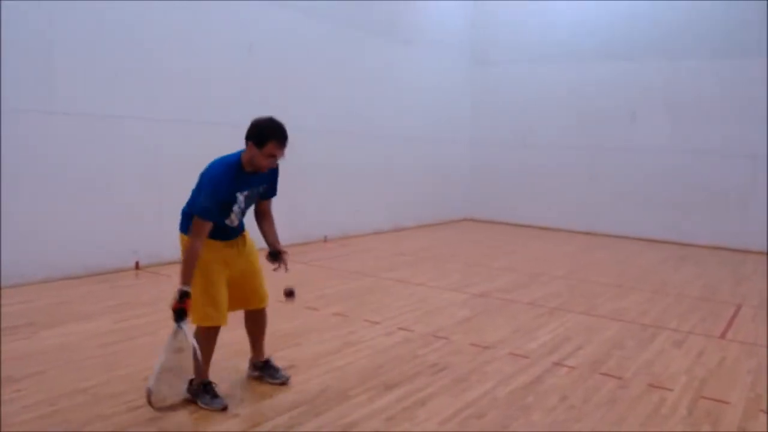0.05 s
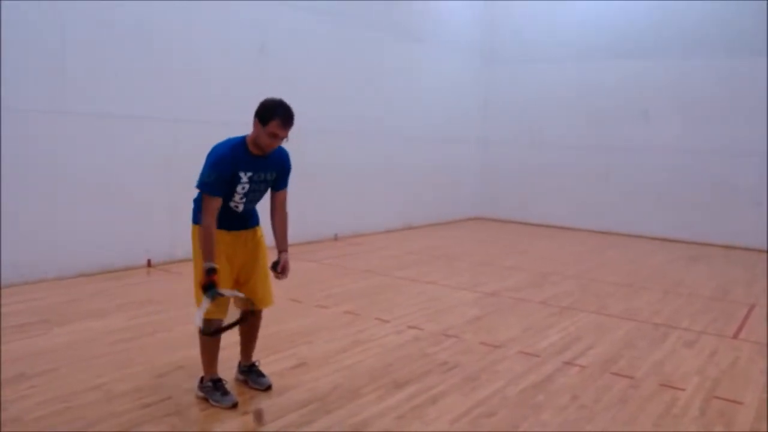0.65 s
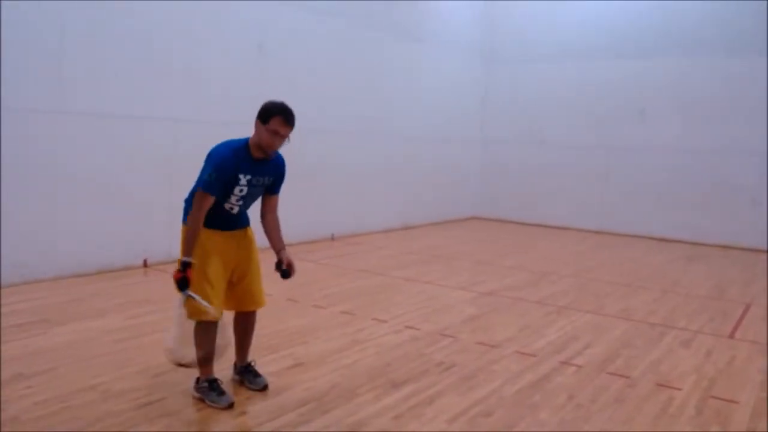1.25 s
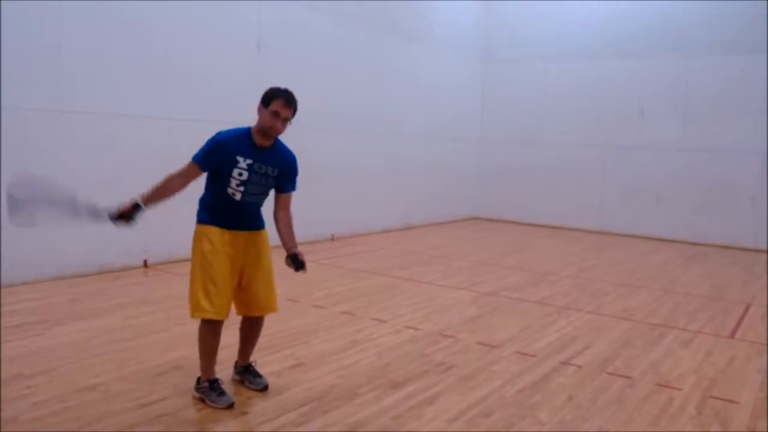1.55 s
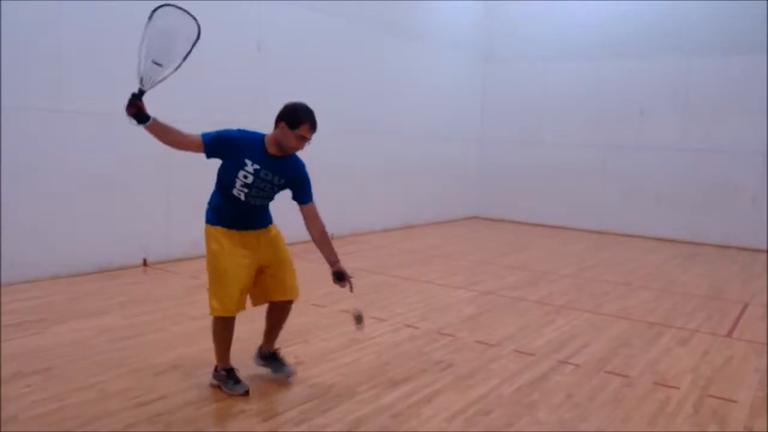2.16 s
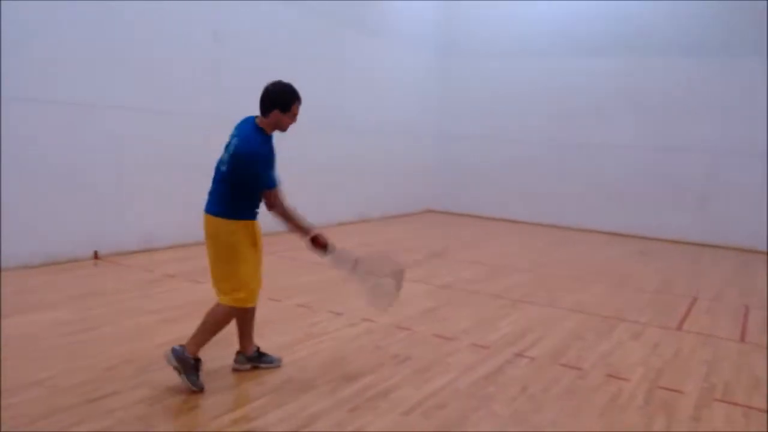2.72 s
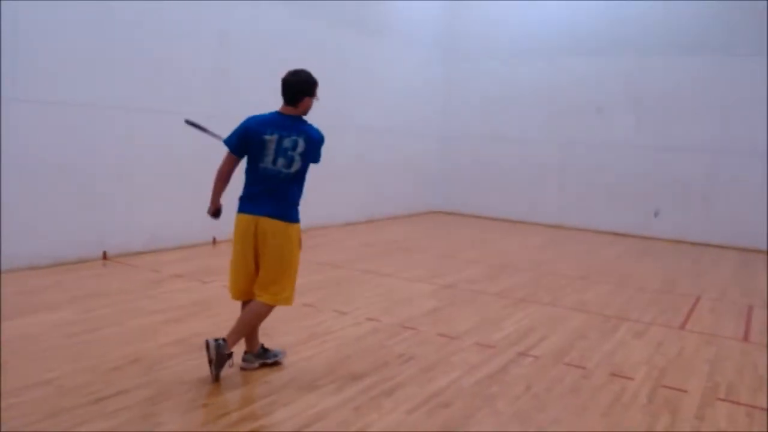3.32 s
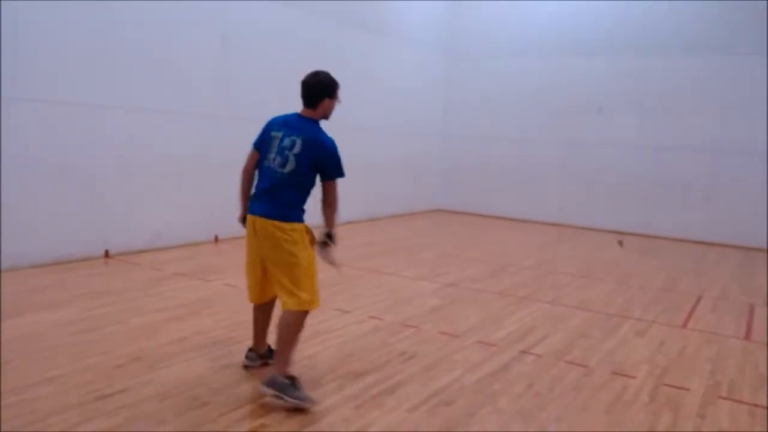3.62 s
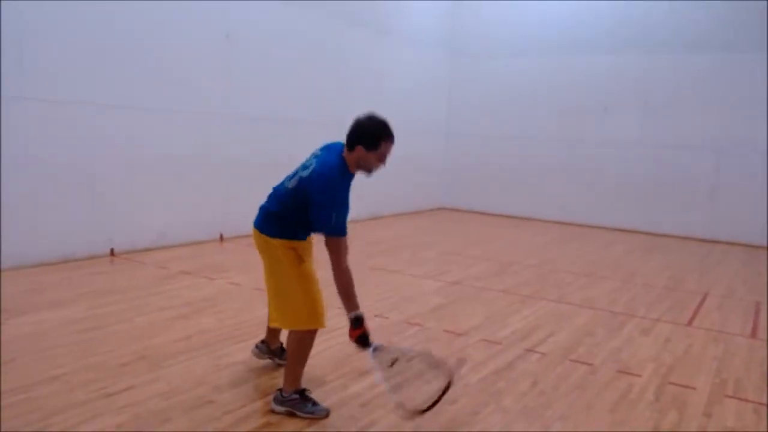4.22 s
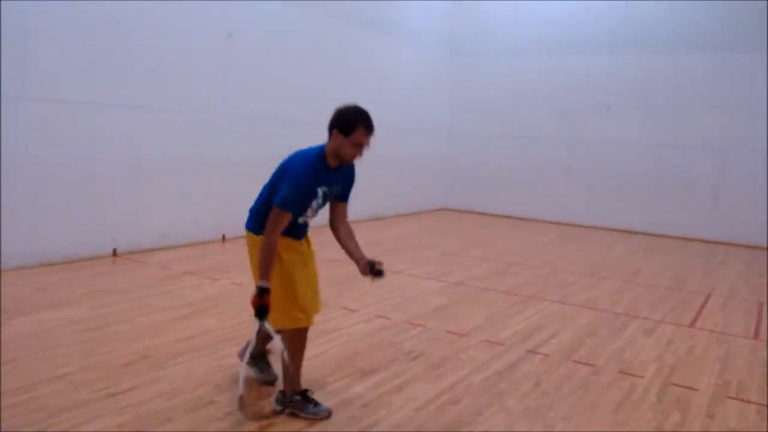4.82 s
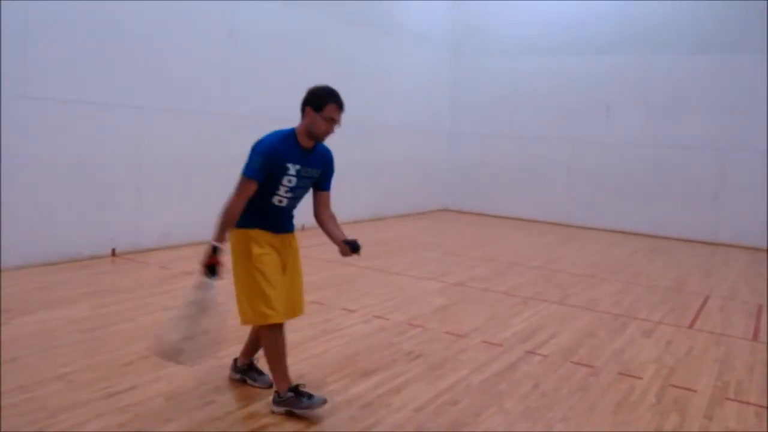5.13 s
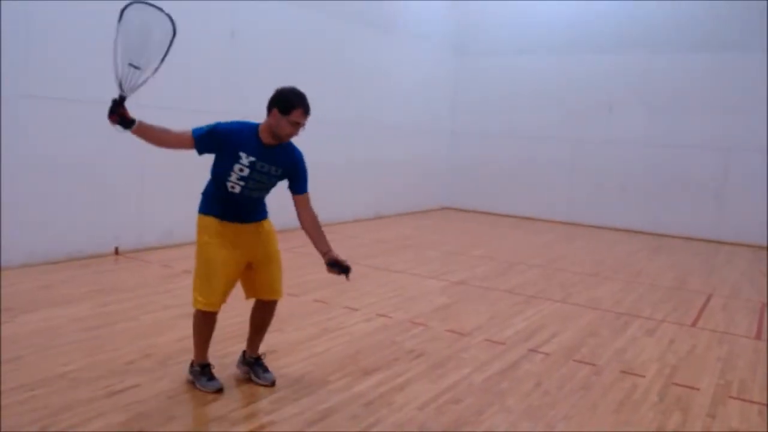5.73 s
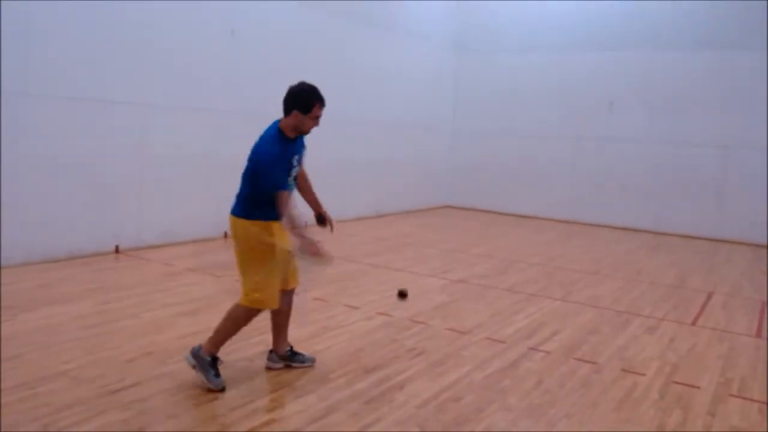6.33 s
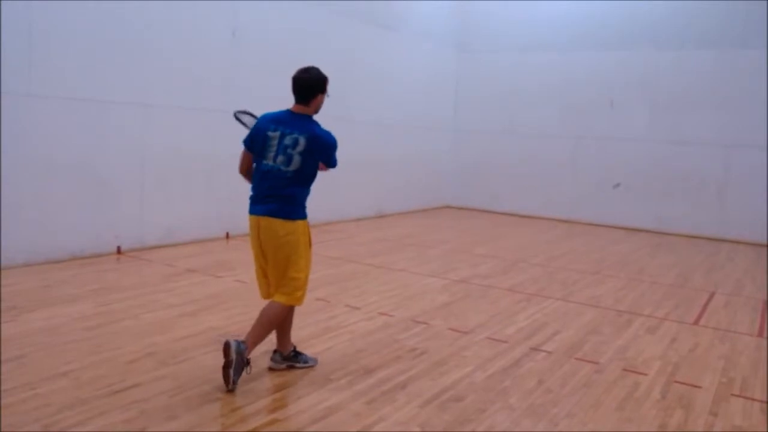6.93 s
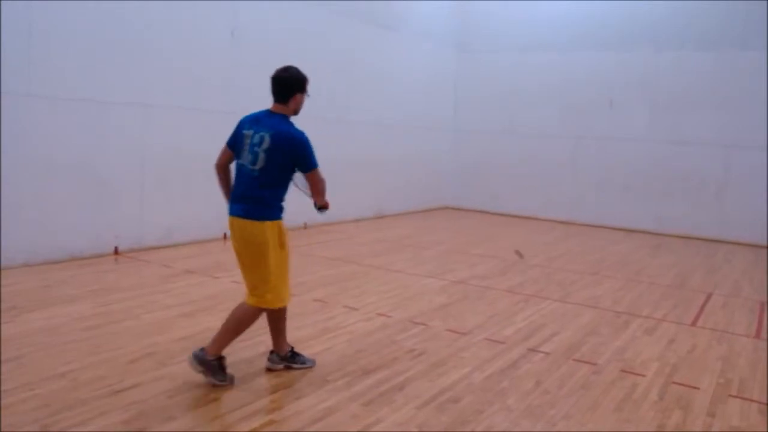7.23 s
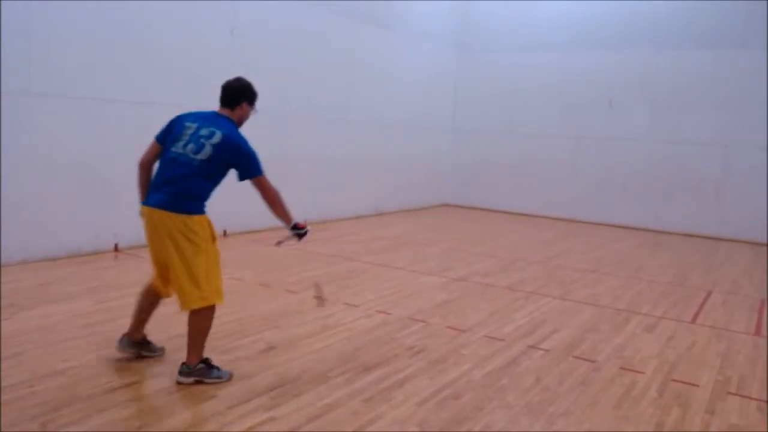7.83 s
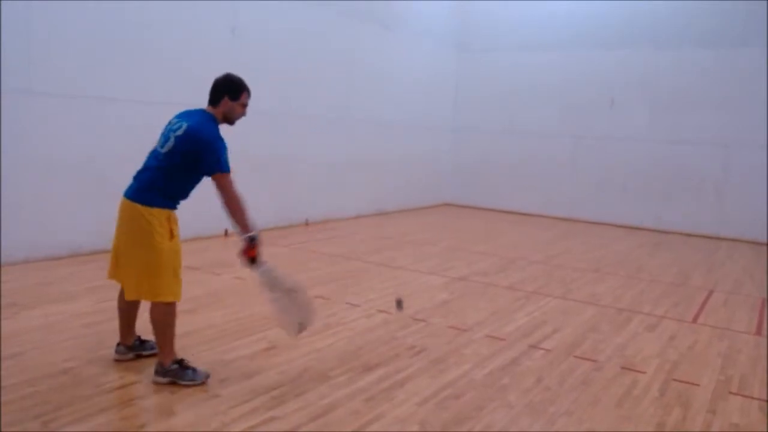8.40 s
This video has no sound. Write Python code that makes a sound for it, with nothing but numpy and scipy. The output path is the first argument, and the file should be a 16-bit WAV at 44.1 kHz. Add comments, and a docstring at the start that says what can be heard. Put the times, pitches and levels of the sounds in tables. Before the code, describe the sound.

The echo of a racquet hit and a bounce rings through a bare indoor court at the start. A shoe squeaks faintly at 0.6 seconds, then a hollow rubber ball bounces twice on wood nearby, with a light tap between, around 1 second. After a bounce at 2.5, a sole brushes softly and the racquet swishes and cracks the ball at 2.8. It slams the front wall at 3.3, overloading the microphone, and skids sharply off the far floor at 3.7. Quick bounces and a tap cluster at 4.5. Another bounce at 6.2 leads to a second drive at 6.5 and a loud wall slam at 7. The ball skips back at 7.4 and 7.9, bounces close at 8.1 and is tapped at 8.3. Every contact echoes long. Ventilation hums throughout, and muffled play swells from next door around 1.7 and 5.5 seconds.

```python
"""Two racquetball shots slam into the front wall of a bare, echoing court and overload the microphone.
Close by, the player bounces and taps the ball, then drives it; it skids or skips back off the far floor.
At every contact the hollow ball rings, its rubber cracks, and the court answers with a long echo.
A sole brushes the boards and the racquet swishes before each stroke; a shoe squeaks once, faintly.
Ventilation hums underneath, and muffled play swells through the wall from the court next door."""
import sys
import numpy as np
from scipy import signal
from scipy.fft import rfft, irfft
from scipy.io import wavfile
from scipy.ndimage import uniform_filter1d

SR = 44100
rng = np.random.default_rng(int(sys.argv[2]) if len(sys.argv) > 2 else 0)


def inscribe(sig):
    """Save sig as 16-bit PCM at rate SR to the path in sys.argv[1].

    A 1-D sig is mono; a 2-D sig holds one channel per row.
    Samples are clipped to [-1, 1] before scaling.
    """
    pcm = np.round(np.clip(np.atleast_2d(sig).T, -1, 1) * 32767)
    wavfile.write(sys.argv[1], SR, pcm.astype(np.int16))


N = 373086

# Spectra of the background and the player's movements. Each row: frequency in Hz, relative level in dB.
VENT_SPECTRUM = [(15, -59.5), (25, -33.5), (49, -25.5), (86, -12.5), (125, -6.5), (146, -7), (243, -14),
                 (415, -23.5), (1310, -25), (1760, -18.5), (2070, -32.5), (3260, -28), (6200, -50),
                 (13500, -46.5), (15000, -86.5)]
NEXT_DOOR_SPECTRUM = [(200, -4.5), (400, -15.5), (650, -9.5), (1000, -0.5), (1200, 0), (1380, -8),
                      (1620, -1), (2100, -26.5), (3000, -20.5), (5000, -46)]
SQUEAK_SPECTRUM = [(5000, -44), (5600, -18), (5750, 0), (5900, -20), (6500, -38)]
SWISH_SPECTRUM = [(300, -10), (1500, -2), (3500, 5), (6300, -12), (8500, 3), (10300, 6), (12000, -24),
                  (15000, -16)]
# Hum of the ventilation. Each row: frequency in Hz, level in dB.
HUM_TONES = [(59.5, -53.5), (119.6, -45.5), (178, -53.5), (253, -55.5)]
# Shots in the court next door. Each row: start in seconds, level in dB.
NEXT_DOOR_SHOTS = [(1.66, -35), (5.42, -31), (5.58, -33.5)]
# Reverberation of the court. Each row: frequency in Hz, seconds to fall 60 dB.
COURT_DECAY = [(60, 2.8), (250, 2), (500, 1.99), (1000, 2.414), (1600, 2.36), (3200, 2.59), (5000, 1.43),
               (7000, 0.99), (10000, 0.68), (14000, 0.44)]

# Ball contacts. Each row: start in seconds, ring level in dB, crack level in dB,
# tilt of the ring in dB per octave, send into the court's echo in dB.
FAR_SKIPS = [(7.3655, -19, -21.5, 10.5, 7), (7.9015, -41, -34.5, -8, 10)]
FAR_SKIDS = [(3.6510, -24.5, -13, 9.5, 7.5)]
NEAR_BOUNCES = [(-.06, -21.5, -46, 1.5, 4.5), (.7862, -27.5, -38.5, 2, 4), (1.0658, -23, -34.5, 0.5, 4.5),
                (2.4590, -26, -40.5, -0.5, 5), (4.4402, -24.5, -35, 0, 5), (4.5400, -22, -53, 0, 5),
                (6.1975, -24, -38.5, 2, 3.5), (8.0745, -22, -32.5, 0, 5)]
RACQUET_STROKES = [(-.12, -16, -22, -1.5, -2), (0.3316, -55, -47, -1, -1), (.9600, -38, -41, 4, -1),
                   (2.8393, -16.5, -26, 0, 4), (4.4903, -28.5, -29, 0, 6.5), (6.5290, -15, -25, 0, 4),
                   (8.3150, -37.5, -27.5, -1, 1)]
WALL_SLAMS = [(3.3135, -10, -12, 2, 18), (6.9680, -10, -11.5, 3, 19.5)]
# Modes of the ball against each surface. Each row: frequency in Hz, relative level in dB,
# seconds to fall 60 dB, extra send into the court's echo in dB.
BALL_ON_FLOOR = [(125, -10.5, 0.044, -4), (214, -8.5, 0.029, 0), (510, -13, 0.022, 2),
                 (1038, 2.5, 0.017, -2), (1243, -4.5, 0.014, 3.5), (1601, 2.5, 0.012, -1),
                 (1817, -9, 0.015, -3), (3080, -2, 0.0043, 4.5), (5040, -13, 0.0027, 5.5)]
BALL_ON_RACQUET = [(141, -4.5, 0.025, 2.5), (275.5, -11, 0.038, 3.5), (505, -15.5, 0.012, 15.5),
                   (825, 1, 0.038, -5.5), (968, -6.5, 0.016, 9.5), (1402, -21.5, 0.082, 8),
                   (1940, -30, 0.0069, 9)]
BALL_ON_WALL = [(141, -13.5, 0.013, 12), (284, 9.5, 0.017, -9), (438.5, -6, 0.028, -1.5),
                (614, 0, 0.0073, -12.5), (823, -0.5, 0.012, 5), (1000, 4.5, 0.014, 4),
                (1134.4, 0.5, 0.035, -6), (1555, 3.5, 0.015, 0.5), (2500, -8.5, 0.0071, -5.5),
                (2880, -7, 0.0098, -5), (3250, -13, 0.0036, 4.5)]
# Spectra of the rubber's crack on floor, strings and wall. Each row: frequency in Hz, relative level in dB.
SKIP_SPECTRUM = [(300, -41), (2300, -30), (2900, -32), (3600, 11), (4400, -11), (5100, -5), (6400, -12.5),
                 (8300, 2.5), (10200, 6), (11500, -1), (13200, -7), (15000, -12)]
SKID_SPECTRUM = [(300, 3.5), (2600, -38), (3350, 5.5), (3900, -10), (4900, -1), (6000, -14.5), (7300, -2.5),
                 (8600, 1.5), (9750, 16), (10900, -3), (12100, 9), (13200, -6.5), (14300, -3)]
BOUNCE_SPECTRUM = [(300, -29.5), (2000, -14.5), (3200, -11.5), (5000, 1), (6400, -14), (8200, 1.5),
                   (9700, 3), (11200, -3), (13000, -22), (15000, -13.5)]
STRING_SPECTRUM = [(300, -31.5), (1000, 0.5), (2300, -4.5), (2900, 2), (4000, -0.5), (5200, -4.5),
                   (6400, -15), (8200, 0.5), (9700, 2), (11200, -6), (13000, -13.5), (15000, -17)]
SLAM_SPECTRUM = [(100, -35), (450, 12), (700, 1.5), (2000, -9.5), (3200, 2.5), (5000, -8), (6400, -16),
                 (8200, -5), (9700, -2), (11200, -7.5), (13000, -13.5), (15000, -12.5)]
# Later arrivals of each contact, mostly reflections off floor and walls; for the near bounce the first, 5.5 ms
# on, is the ball ringing a second time. Each row: delay in seconds, level in dB against the direct sound.
SKIP_REFLECTIONS = [(.0130, -10), (0.026, -5)]
SKID_REFLECTIONS = [(0.0142, 2), (0.0228, -.5), (.0310, -1)]
BOUNCE_REFLECTIONS = [(.0055, -6.5), (0.0191, -7.5)]
STROKE_REFLECTIONS = [(.0048, -16), (0.0189, -21), (0.029, -43)]
SLAM_REFLECTIONS = [(.0022, -5), (0.0118, 5), (0.017, -3.5), (0.049, -6), (0.078, 2)]


def gain_of(db):
    """Decibels to amplitude."""
    return 10 ** (np.asarray(db) / 20)


def unit_rms(x):
    """Scales to rms 1."""
    return x / np.sqrt(np.mean(x ** 2) + 1e-20)


def blow_size(x):
    """The rms that a blow would have if packed into a hundredth of a second."""
    return np.sqrt(np.sum(x ** 2) / (SR / 100))


def value_at(table, hz):
    """Reads a table along a log-frequency axis."""
    table_hz, values = np.transpose(table)
    return np.interp(np.log(hz + 1), np.log(table_hz + 1), values)


def add(mix, start_s, sound):
    """Mixes a sound in; it may have begun before zero."""
    at = round(start_s * SR)
    sound = sound[max(-at, 0):]
    part = mix[max(at, 0):][:len(sound)]
    part += sound[:len(part)]


def coloured(x, spectrum):
    """Minimum-phase filter with the given spectrum, so attacks stay sharp."""
    hz = abs(np.fft.fftfreq(2048, 1 / SR))
    log_gain = np.log(gain_of(value_at(spectrum, hz)))
    taps = np.fft.ifft(np.exp(np.conj(signal.hilbert(log_gain)))).real
    return signal.fftconvolve(x, taps)[:len(x)]


def noise(spectrum):
    """Steady noise of rms 1 with the given spectrum."""
    gains = gain_of(value_at(spectrum, np.fft.rfftfreq(N, 1 / SR)))
    return unit_rms(irfft(rfft(rng.standard_normal(N)) * gains, N))


def ventilation(air_db=-39, waver_rad=0.82):
    """The court's room tone: rushing air and a wavering mains hum."""
    t = np.arange(N) / SR
    knots = np.linspace(0, t[-1], num=40)
    room_tone = gain_of(air_db) * noise(VENT_SPECTRUM)
    for hz, db in HUM_TONES:
        drift = np.interp(t, knots, rng.standard_normal(len(knots)))
        room_tone += gain_of(db) * np.sqrt(2) * np.sin(2 * np.pi * hz * t + waver_rad * drift)
    return room_tone


def next_door(rise_s=0.11, t60_s=3.1, wash_db=-46):
    """Shots beyond the wall swell and die with that court's echo, over a wash of more distant play."""
    start_s, db = np.transpose(NEXT_DOOR_SHOTS)[:, :, None]
    age = np.maximum(np.arange(N) / SR - start_s, 0)
    rise = 1 - np.exp(-(age / rise_s) ** 2)
    swells = gain_of(db) * rise * np.exp(-np.log(1000) * age / t60_s)
    power = gain_of(wash_db) ** 2 + (swells ** 2).sum(0)
    return np.sqrt(power) * noise(NEXT_DOOR_SPECTRUM)


def shoe_squeak(db=-68, centre_s=0.6, half_width_s=0.15):
    """A sole turns on the varnish: one thin squeak, faint at the microphone."""
    envelope = np.exp(-((np.arange(N) / SR - centre_s) / half_width_s) ** 4)
    return gain_of(db) * envelope * noise(SQUEAK_SPECTRUM)


def swishes(step_db=-41.5, swing_db=-39):
    """A sole brushes the floor, then the racquet cuts the air; both levels follow the stroke's ring."""
    t, level = np.arange(N) / SR, np.zeros(N)
    step_lead_s, step_half_s = 0.2, 0.15
    swing_lead_s, swing_half_s = 0.02, 0.036
    for hit_s, ring_db, *_ in RACQUET_STROKES:
        level += gain_of(ring_db + step_db) * np.exp(-((t - hit_s + step_lead_s) / step_half_s) ** 2)
        level += gain_of(ring_db + swing_db) * np.exp(-((t - hit_s + swing_lead_s) / swing_half_s) ** 2)
    return level * noise(SWISH_SPECTRUM)


def court_echo(x, build_s, tail_db=7, clump_db=0.8):
    """Diffuse tail: reflections thicken over build_s and come in clumps; the air takes the treble first."""
    hz, frame_s = np.fft.rfftfreq(512, 1 / SR), np.arange(400) * 256 / SR
    phases = np.exp(2j * np.pi * rng.random((len(hz), len(frame_s))))
    clumps = unit_rms(uniform_filter1d(rng.standard_normal(len(frame_s)), size=3))
    decay = np.exp(-np.log(1000) * frame_s / value_at(COURT_DECAY, hz)[:, None])
    tail = signal.istft(phases * decay * gain_of(clump_db * clumps))[1]
    tail /= signal.istft(phases[:, :20])[1].std()  # rms about 1 before it decays
    tail *= 1 - np.exp(-(np.arange(len(tail)) / SR / build_s) ** 4)
    return signal.oaconvolve(x, tail * gain_of(tail_db) / np.sqrt(SR))


def ball_ring(modes, tilt_db, rise_s, stretch, relax_s=0.0048):
    """The shell rings, sharp in pitch while stretched; gives (towards the microphone, into the court)."""
    hz, db, t60_s, send_db = np.transpose(modes)[:, :, None]
    t = np.arange(SR // 10) / SR
    cycles = hz * np.cumsum(1 + stretch * np.exp(-t / relax_s)) / SR
    partials = gain_of(db + tilt_db * np.log2(hz / 1000)) * np.sin(2 * np.pi * cycles)
    partials *= np.exp(-np.log(1000) * t / t60_s) * (1 - np.exp(-t / rise_s))
    partials /= blow_size(partials.sum(0))
    return partials.sum(0), (partials * gain_of(send_db)).sum(0)


def rubber_crack(spectrum, contact_s, buzz_db=-20, buzz_s=0.006):
    """A burst of noise that lasts as long as the rubber is squashed, with a short buzz after it."""
    t = np.arange(SR // 10) / SR
    squash = t / contact_s * np.exp(-(t / contact_s) ** 2)
    buzz = gain_of(buzz_db) * np.exp(-t / buzz_s)
    burst = coloured(rng.standard_normal(len(t)) * (squash + buzz), spectrum)
    return burst / blow_size(burst)


def impacts(contacts, modes, spectrum, reflections, rise_s, contact_s, build_s, crack_send_db,
            reflected_crack_db=0, stretch=0, side_db=-9):
    """Ring and crack reach the microphone directly, off nearby surfaces, then as a tail: (mid, side)."""
    mid, side = np.zeros((2, N))
    # Summed over all directions, the crack has a smooth spectrum: a click feeds the tail.
    click = coloured(signal.unit_impulse(SR // 10), spectrum)
    click /= blow_size(click)
    for start_s, ring_db, crack_db, tilt_db, send_db in contacts:
        ring, room_ring = gain_of(ring_db) * np.array(ball_ring(modes, tilt_db, rise_s, stretch))
        for delay_s, path_db in [(0, 0)] + list(reflections):
            arrival_s = start_s + delay_s
            crack_gain = gain_of(crack_db + path_db + reflected_crack_db * (delay_s > 0))
            add(mid, arrival_s, gain_of(path_db) * ring + crack_gain * rubber_crack(spectrum, contact_s))
            add(side, arrival_s, gain_of(side_db) * crack_gain * rubber_crack(spectrum, contact_s))
        room_crack = gain_of(crack_db + crack_send_db + send_db) * click
        add(mid, start_s, court_echo(gain_of(send_db) * room_ring + room_crack, build_s))
        add(side, start_s, gain_of(side_db) * court_echo(room_crack, build_s))
    return np.array([mid, side])


def far_skips():
    """The ball bounces back over the far floor."""
    return impacts(FAR_SKIPS, BALL_ON_FLOOR, SKIP_SPECTRUM, SKIP_REFLECTIONS,
                   rise_s=0.0022, contact_s=0.0038, build_s=0.012, crack_send_db=-0.5)


def far_skid():
    """The ball skids off the far floor at speed, its rubber squealing."""
    return impacts(FAR_SKIDS, BALL_ON_FLOOR, SKID_SPECTRUM, SKID_REFLECTIONS,
                   rise_s=0.00057, contact_s=0.0034, build_s=0.045, crack_send_db=3)


def near_bounces():
    """The ball slaps the wooden floor close by, at the player's feet."""
    return impacts(NEAR_BOUNCES, BALL_ON_FLOOR, BOUNCE_SPECTRUM, BOUNCE_REFLECTIONS, rise_s=0.0021,
                   contact_s=0.0026, build_s=0.027, crack_send_db=-3, reflected_crack_db=-5.5)


def racquet_strokes():
    """Drives and light taps: the strings snap and stretch the ball, whose pitch falls as it relaxes."""
    return impacts(RACQUET_STROKES, BALL_ON_RACQUET, STRING_SPECTRUM, STROKE_REFLECTIONS, rise_s=0.01,
                   contact_s=0.0037, build_s=0.032, crack_send_db=2.5, reflected_crack_db=10.5,
                   stretch=0.35)


def wall_slams():
    """The ball smacks the front wall and fills the court; the microphone hears mostly the echo."""
    return impacts(WALL_SLAMS, BALL_ON_WALL, SLAM_SPECTRUM, SLAM_REFLECTIONS, rise_s=0.0013,
                   contact_s=0.0026, build_s=0.0071, crack_send_db=-8.5, reflected_crack_db=-8.5)


def scene():
    """The play over a centred background, left and right at a closely spaced microphone pair."""
    play, side = near_bounces() + racquet_strokes() + wall_slams() + far_skid() + far_skips()
    mid = play + ventilation() + next_door() + swishes() + shoe_squeak()
    return np.array([mid + side, mid - side])


def record(dry, low_cut_hz=48, clip_hardness=11, stereo_above_hz=5000, top_hz=14400):
    """The microphone sheds deep bass, overloads on wall hits, is stereo only in the treble, cuts the top."""
    thin = signal.sosfilt(signal.butter(4, low_cut_hz, "high", fs=SR, output="sos"), dry)
    left, right = thin / (1 + abs(thin) ** clip_hardness) ** (1 / clip_hardness)
    mid = (left + right) / 2
    treble_only = signal.butter(10, stereo_above_hz, "high", fs=SR, output="sos")
    side = signal.sosfilt(treble_only, (left - right) / 2)
    lowpass = signal.firwin(255, top_hz, window=("kaiser", 8), fs=SR)
    return signal.oaconvolve(np.array([mid + side, mid - side]), lowpass[None], "same")


dry = scene()
out = record(dry)
inscribe(out)
```